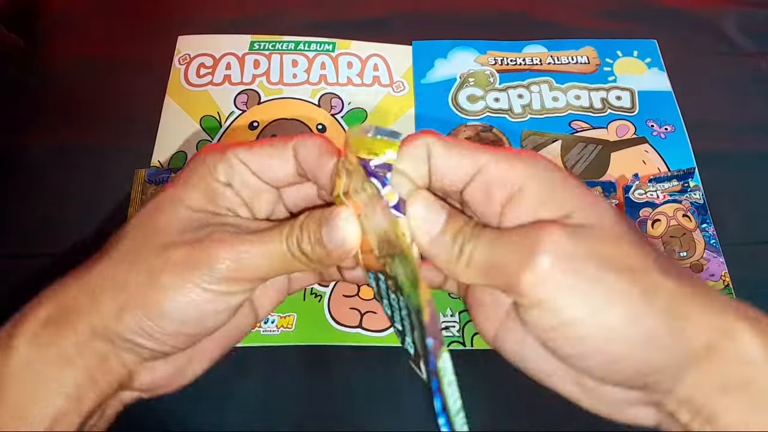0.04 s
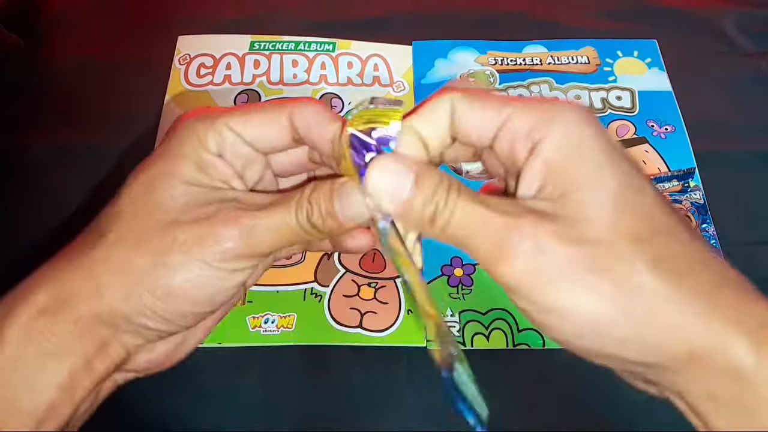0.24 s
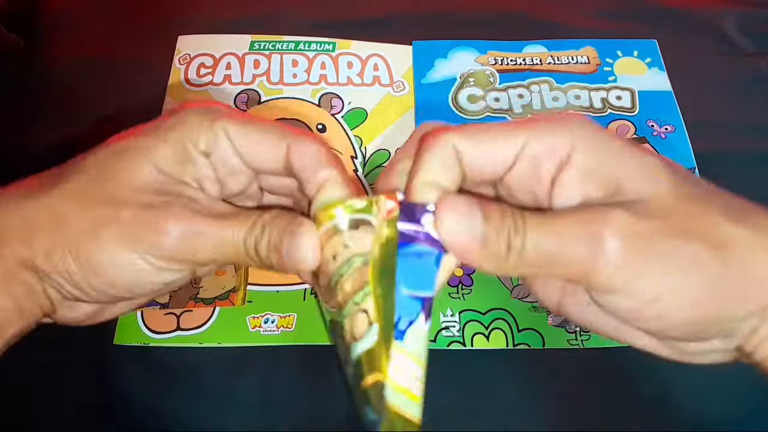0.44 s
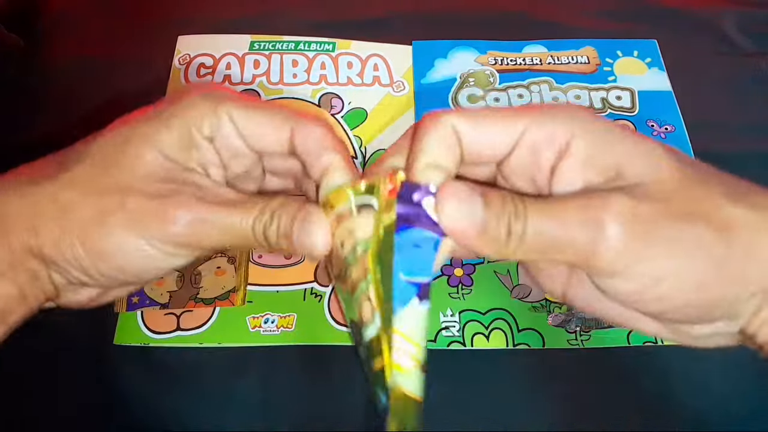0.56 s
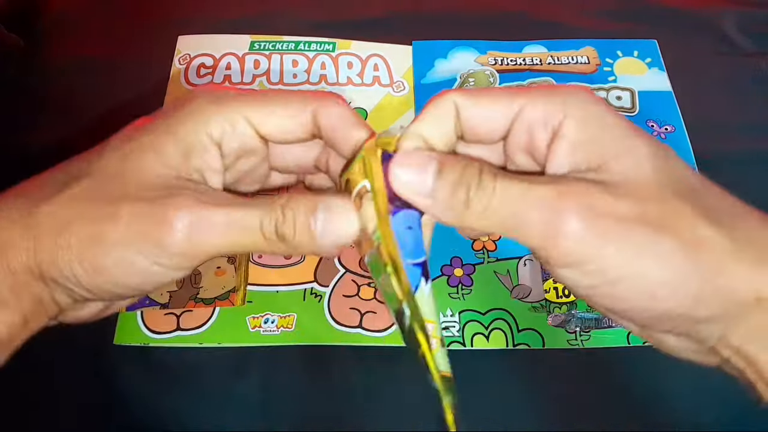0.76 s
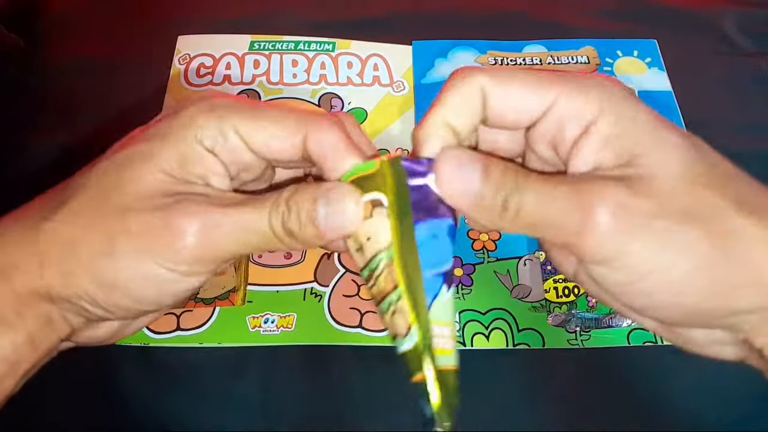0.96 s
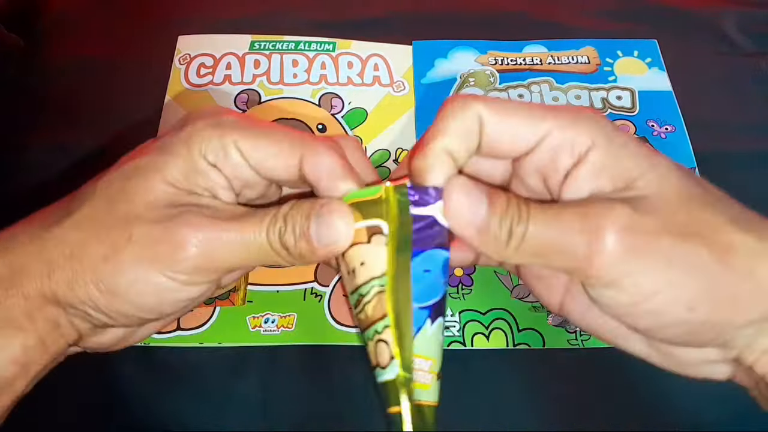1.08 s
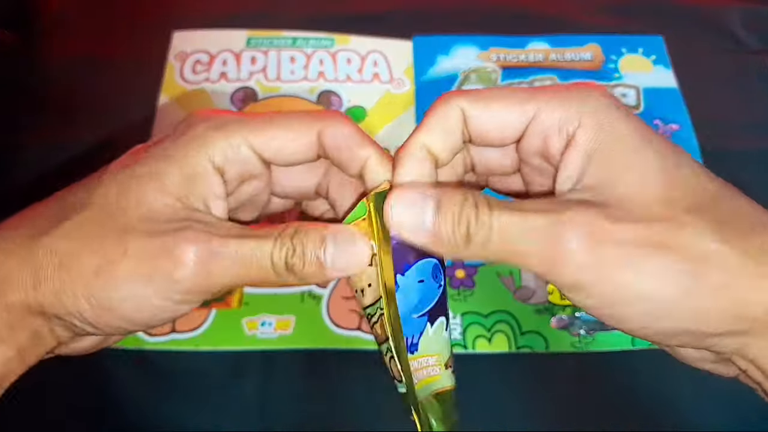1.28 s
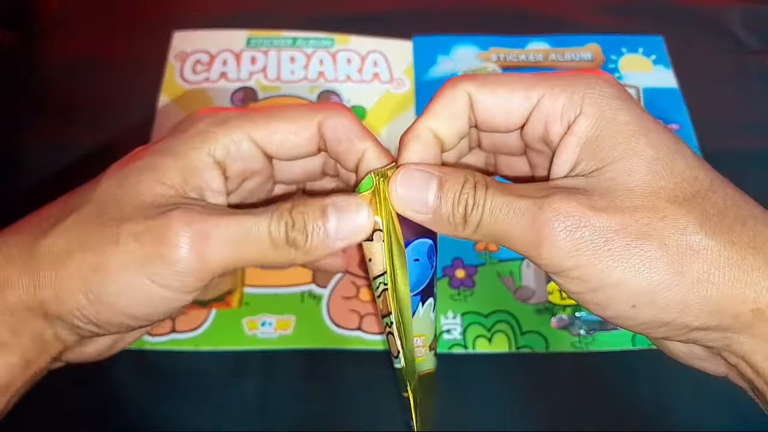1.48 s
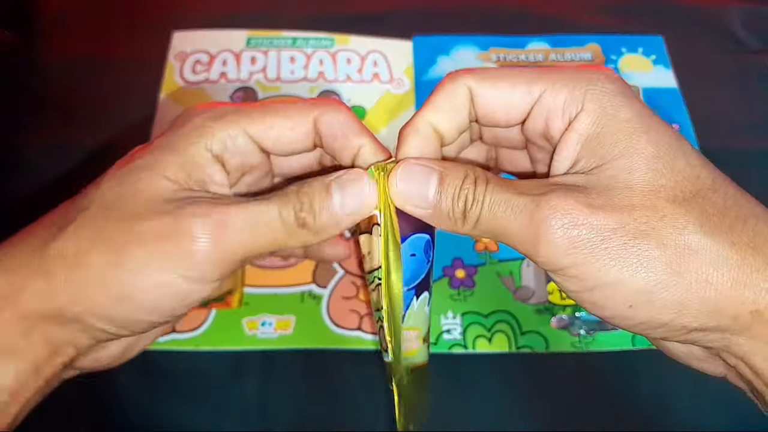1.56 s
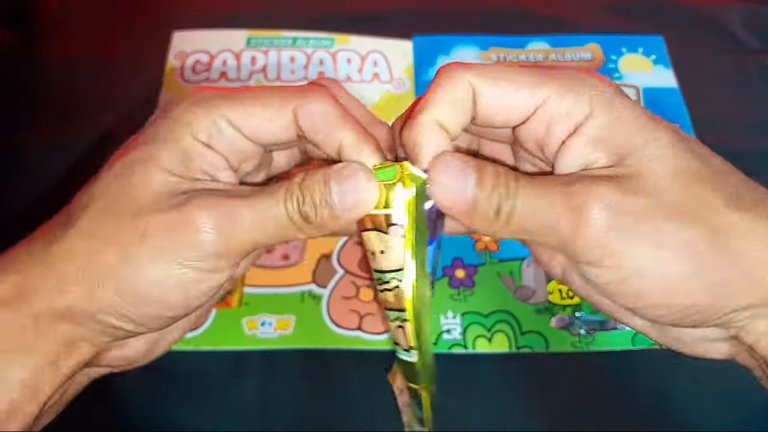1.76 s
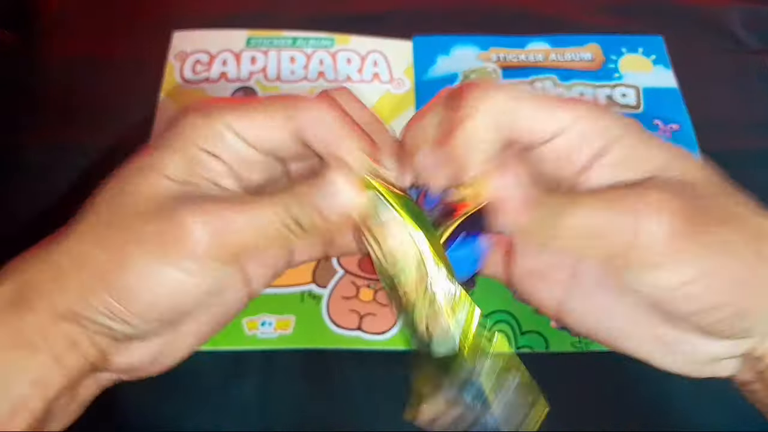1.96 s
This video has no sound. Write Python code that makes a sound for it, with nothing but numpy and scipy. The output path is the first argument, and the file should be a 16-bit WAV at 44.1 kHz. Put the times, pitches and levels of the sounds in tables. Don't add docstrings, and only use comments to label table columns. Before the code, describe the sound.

A thin foil packet is crinkled by hand very close to a phone microphone in a small room: bright snaps cluster early, scatter through the middle, thin out, then burst into a dense tear at the end.

```python
import sys
import numpy as np
from scipy import signal
from scipy.fft import rfft, irfft
from scipy.io import wavfile
from scipy.ndimage import uniform_filter1d

SR = 44100
rng = np.random.default_rng(int(sys.argv[2]) if len(sys.argv) > 2 else 0)


def bounce(signal):
    frames = np.transpose(np.atleast_2d(signal))
    limited = np.clip(frames, -1, 1)
    pcm = np.round(limited * 32767).astype(np.int16)
    wavfile.write(sys.argv[1], SR, pcm)


def voltage_ratio(level):
    return 10 ** (np.asarray(level, float) / 20)


N = 89390
FAR_DB = np.array([[0], [-5]])


def read(points, hz):
    f, value = np.transpose(points)
    return np.interp(np.log(hz + 1), np.log(f + 1), value)


def evened(x):
    return x / np.sqrt(np.mean(x ** 2) + 1e-20)


def add(mix, start, sound):
    part = mix[:, max(round(start * SR), 0):][:, :sound.shape[1]]
    part += sound[:, :part.shape[1]]


def pair(noise, same):
    return np.array([noise[0], same * noise[0] + np.sqrt(1 - same ** 2) * noise[1]])


def bandpass(x, low_hz, high_hz):
    return signal.sosfilt(signal.butter(2, [low_hz, high_hz], "bandpass", fs=SR, output="sos"), x)


def ringing(t, hz, width_hz):
    return np.sin(2 * np.pi * hz * t) * np.exp(-np.pi * width_hz * t)


# (frequency [Hz], level [dB per Hz])
HUM_SPECTRUM = [(25, -22), (60, 42), (170, 31.5), (700, -48), (2500, -9), (9500, -31)]


def room_hum():
    z = rfft(pair(rng.standard_normal((2, N)), 0.59))
    z = z * voltage_ratio(read(HUM_SPECTRUM, np.fft.rfftfreq(N, 1 / SR)))
    return voltage_ratio(-65.5) * evened(irfft(z, N)) * voltage_ratio(np.array([[2], [-3]]))


# (frequency [Hz], time to fall 60 dB [s])
ROOM_DECAY = [(900, 0.62), (1500, 0.4), (14000, 0.23)]
# (frequency [Hz], level [dB])
WALL_COLOUR = [(700, -2), (2000, -0.5), (4500, 0.5), (7400, -6.5), (12000, 2.5)]


def wall_echoes(x):
    room_db, turn_s = -9, .09
    size = SR // 2
    taps = np.zeros((6, size))
    at = np.arange(200, size - 20, 20) + rng.integers(0, 20, (6, (size - 201) // 20))
    np.put_along_axis(taps, at, rng.choice([-1., 1.], at.shape), 1)
    hz, t, z = signal.stft(taps, SR, nperseg=256)
    z = z * voltage_ratio(read(WALL_COLOUR, hz)[:, None] - 60 * t / read(ROOM_DECAY, hz)[:, None])
    tail = signal.istft(z, SR, nperseg=256)[1][:, :size]
    tail = voltage_ratio(room_db) * tail / np.linalg.norm(tail[0])
    turn = np.pi * np.arange(N) / SR / turn_s
    echoes = np.zeros((2, N))
    for k in range(3):
        share = np.sqrt(2 / 3) * np.cos(turn + k * np.pi / 3)
        echoes += signal.fftconvolve((x * share)[None], tail[k::3], axes=1)[:, :N]
    return echoes


# (time [s], peak level [dB], pitch [Hz])
FINGER_THUDS = [
    (.118, -30, 494),
    (0.375, -25.5, 386),
    (0.503, -36, 221),
    (0.656, -35.5, 303),
    (0.996, -34, 197),
    (1.173, -28, 348),
    (1.526, -30, 418),
    (2.017, -30.5, 232),
]


def thud(start, peak_db, hz):
    turns = np.arange(0, 8 / hz, 1 / SR) * hz
    puff = uniform_filter1d(rng.standard_normal(6000), size=20)[:len(turns)]
    puff = evened(np.gradient(uniform_filter1d(puff, size=20)))
    u = turns / 0.71
    knock = (np.sin(2 * np.pi * turns) + 0.5 * puff) * u * np.exp(1 - u)
    return start, voltage_ratio(peak_db + FAR_DB) * knock


def fingers():
    hands = np.zeros((2, N))
    for row in FINGER_THUDS:
        add(hands, *thud(*row))
    return hands


# (time [s], crackle level [dB])
HAND_STRAIN = [(0, -25), (.05, -37.5), (0.122, -32.5), (.28, -33), (.305, -20.5), (.4, -19.5), (.5, -30.5),
               (.63, -32.5), (.71, -31.5), (.88, -36.5), (1.183, -28.5), (1.4, -53.5), (1.53, -43),
               (1.64, -37), (1.84, -63), (1.898, -13), (2.03, -26.5)]


def strain_at(s):
    at, db = np.transpose(HAND_STRAIN)
    return np.interp(s, at, db - np.mean(db))


def skin_rub():
    rub_db, rub_hz = -57, 391
    strain_db = np.minimum(strain_at(np.arange(N) / SR), 8)
    lumps = evened(uniform_filter1d(rng.standard_normal(N), size=600))
    dull = evened(bandpass(pair(rng.standard_normal((2, N)), 0.68), rub_hz / 2, rub_hz * 1.63))
    return voltage_ratio(rub_db + strain_db + 5.5 * lumps + FAR_DB) * dull


def fine_crackle():
    crackles_per_s, spread_db, life_s = 1800, 4.2, .0004
    size = voltage_ratio(spread_db * np.minimum(rng.exponential(1, N), 3.2))
    size = size * (rng.random(N) < crackles_per_s / SR)
    life = signal.lfilter([1], [1, -np.exp(-1 / (life_s * SR))], size)
    thin = signal.butter(1, 800, "highpass", fs=SR, output="sos")
    grains = signal.sosfilt(thin, pair(rng.standard_normal((2, N)), 0.79) * life)
    s, db = np.transpose(HAND_STRAIN)
    return voltage_ratio(np.interp(np.arange(N) / SR, s, db)) * evened(grains)


def body_knock(foil):
    push = bandpass(foil ** 2, 70, 260)
    ring = ringing(np.arange(2 ** 11) / SR, 418, 17.4)
    knock = signal.oaconvolve(abs(foil), np.gradient(ring))[:N]
    return voltage_ratio(FAR_DB) * (voltage_ratio(-63.5) * evened(push) + voltage_ratio(-59) * evened(knock))


def snap(port, start, peak_db, sheet_hz=3500, sheet_db=-6):
    lead_s, rise_s, snap_s, after_s = .005, .0015, .0007, .005
    creak_db, after_db, snap_db, even_db = -17.5, -22, -3.5, -3
    split_hz = 5200
    t = np.arange(0, .025, 1 / SR)
    noise = rng.standard_normal((2, len(t) + 1))
    tense_db = strain_at(start)
    life = snap_s * voltage_ratio(tense_db / 7) * np.exp(0.2 * np.clip(noise[0, -1], -2, 2))
    since = t - lead_s
    creak = voltage_ratio(min(creak_db + tense_db, -2)) * np.exp(-abs(since) / rise_s)
    dying = np.exp(-abs(since) / life) + voltage_ratio(after_db) * np.exp(-abs(since) / after_s)
    shape = np.where(since < 0, creak, dying)
    tick = 0.62 * np.sign(noise[1, -1]) * (np.arange(len(t)) == round(lead_s * SR))
    z = rfft(pair(noise[:, :-1], 0.25) * shape + tick)
    burst = irfft(z / np.sqrt(uniform_filter1d(abs(z) ** 2, size=20)), len(t))

    floor_hz = min(440 * voltage_ratio(-0.71 * peak_db), 0.35 * sheet_hz)
    low = bandpass(burst, floor_hz, split_hz)
    fizz = signal.sosfilt(signal.butter(2, split_hz, "highpass", fs=SR, output="sos"), burst)
    rung = irfft(rfft(burst) * rfft(ringing(t, sheet_hz, 350)), len(t))
    plain = evened(low + low[0])
    tilt_db = (sheet_db - even_db) / 2
    share = .42 * min(voltage_ratio(tilt_db), 2)

    sheet = np.vstack([share * evened(rung) + (1 - share) * plain, .75 * plain[:1]])
    fizz = np.vstack([fizz, fizz[:1]])
    both = voltage_ratio(tilt_db) * evened(sheet) + voltage_ratio(-tilt_db) * evened(fizz)
    heard = np.convolve(both[0], port)
    peak = np.sqrt(uniform_filter1d(heard ** 2, size=31).max())
    return start - lead_s, voltage_ratio(peak_db + snap_db) * both / peak


# (time [s], peak level [dB], sheet pitch [Hz],
# sheet over fizz [dB])
MAIN_CREASES = [(0.0679, -8.5, 3770, 22), (0.1221, -3.5, 4650.0, -5.0), (0.1602, -7, 5000, -8.5),
                (0.201, -7, 3700, -9.5), (0.2142, -6, 4530, -5), (0.2193, -4, 2410.0, -19),
                (0.239, -3.5, 2660, -7), (0.2918, -5.5, 2530, -16), (0.2998, -4, 3770, -8),
                (0.302, -3.5, 4230, -6.5), (0.3119, -3, 2340, -1), (0.3263, -7.5, 2000, -7),
                (0.3355, -10.5, 2010, -1), (0.34, 3, 4820, -8.5), (0.3567, -3.5, 2740, -8),
                (0.3621, 2.5, 3870, -10), (0.3705, -0.5, 4330, -7), (0.377, -2.5, 1440, -5),
                (0.3857, -13.5, 4600, -1), (0.4101, -10, 2080, -7), (0.5713, -5, 4200, -8),
                (0.6051, -6, 3750, 1), (0.611, -2.5, 3630, -4), (0.625, -5, 4300, -10.5),
                (0.642, -5, 3000, -6.5), (0.6486, -3, 4240, -9.5), (0.658, -5.5, 4100, -7.5),
                 (0.6723, -9, 4100, -12), (0.7502, -7.5, 2130, 5), (0.761, -5, 4750, -8),
                 (0.8083, -8.5, 4040, -10.5), (0.834, -13.5, 4670, -11), (0.8539, -2.5, 2460, -10),
                 (0.8695, -3.5, 2500.0, -45), (0.8827, -8, 4700, -8.5), (0.9069, -5, 5170, 23),
                 (0.9242, -5.5, 2050, -5), (0.951, -5.5, 4600, -12.5), (0.9997, -6, 2250, -4.5),
                 (1.0898, -4, 1700, -0.5), (1.1034, -9, 3460, -4), (1.121, -8, 1280, -6),
                 (1.1412, -8.5, 4350, 23), (1.1517, -5, 4680, -6), (1.2821, -4.5, 2500, -7),
                 (1.4104, -12.5, 4150, -9.5), (1.4604, -13.5, 3550, -17),
                (1.4915, -6, 4370, -8.5), (1.5264, -10, 1204, 19), (1.5338, -7, 1980.0, -19),
                (1.571, -15.5, 3870, 23), (1.6025, -3.5, 4800, -10), (1.63, -1, 2600, -8.5),
                (1.639, -6, 4230, 2.5), (1.82, -10.5, 4220, -8), (1.8343, -5.5, 4170, -8.5),
                (1.882, 0.5, 1610, -9), (1.8904, -5, 4200, -8), (1.8975, -0.5, 3960, -2),
                (1.8994, -8.5, 1200, 4), (1.9061, -6.5, 1920, -3.5), (1.9172, -6.5, 4400, -5),
                (1.921, -5.5, 4000, -2), (1.9305, -3, 4260, -6), (1.954, -11.5, 2350, -2),
                (1.963, -10, 1930, -3), (1.9759, -4.5, 4160, 3), (1.9792, -1.5, 4020, -6),
                (1.9902, -0.5, 5080, -11), (2.002, -12, 4960, -5)]
FURTHER_CREASES = [
    (1.175, -16, 1410, 0),
    (1.9673, -6, 4040, 10),
    (1.971, -7, 4200, 1),
]
# (time [s], peak level [dB])
FLURRY_CREASES = [(0.082, -13.5), (0.0926, -20), (0.1178, -10.5), (0.279, -16.5), (0.286, -18),
                  (0.3179, -7.5), (0.352, -9.5), (0.392, -8), (0.5637, -14.5), (0.5945, -12.5),
                  (0.745, -11.5), (0.8022, -19.5), (0.81, -20), (0.8644, -12), (0.8731, -10.5),
                  (0.8874, -9.5), (0.8907, -7.5), (0.9127, -10.0), (0.988, -17), (0.9946, -5), (1.226, -17),
                  (1.6437, -9), (1.648, -9), (1.6552, -13), (1.788, -22), (1.8778, -11)]
# (time [s], peak level [dB], sheet pitch [Hz], sheet over
# fizz [dB])
SMALL_CREASES = [(.009, -34, 3400, -7), (0.0625, -15, 3550, -11), (.194, -17, 3600, -7),
                 (.501, -18, 1530, 0), (0.487, -25, 1320, 7), (.527, -21, 1200, 7),
                 (1.264, -27.5, 1870, -4), (1.338, -30.5, 3960, -6), (1.5, -20, 3800, 0),
                 (1.5147, -15, 2230, -11), (1.5866, -13, 4390, -18), (1.856, -22.5, 1700, 5),
                 (1.8745, -14.5, 1430, 4.5),
                 (0.0031, -19.5, 3660, -6), (0.1137, -16, 4100, 11), (0.1525, -16, 4870, -7),
                      (0.23, -14, 4440, -7), (0.394, -8.5, 4260, -5.5), (0.404, -17, 2700, -10),
                      (0.4207, -14, 2800, -12), (0.4627, -21, 1600, -4), (0.512, -18.5, 2710, -9),
                      (0.537, -19, 2330, -10), (0.5409, -22, 2100, -4), (0.5432, -20, 2710, -6),
                      (0.5833, -22, 3800, 2), (0.587, -32, 4080, 0), (0.6339, -16, 3700, -6),
                      (0.637, -21, 3770, -8), (0.7278, -21.5, 4010, -2), (0.732, -26, 2410, -3),
                      (0.7572, -14.5, 3830, 10), (0.794, -27, 3060, -16),
                 (0.8128, -12, 4620, 1), (0.8298, -3, 3880, -12.5), (0.847, -16, 3940, -5.5),
                      (0.8777, -18, 4030, -7), (0.8986, -11.5, 2220, -5), (0.918, -12, 3360, -18),
                      (1.021, -23.5, 2220, -5), (1.2004, -19, 4420, -6), (1.213, -17, 4000, -8),
                      (1.273, -29, 1890, 8), (1.3766, -34, 3820, 4), (1.5227, -14, 2450, -12),
                      (1.529, 3, 3640, -9), (1.597, -29, 3300, -13), (1.6617, -11.5, 4090, -11.5),
                      (1.7507, -29, 4010, -7), (1.7593, -26, 3960, -13), (1.7662, -33, 4050, -9),
                      (1.7706, -26, 4820, -6), (1.777, -28, 4070, -7), (1.781, -24.5, 4900, 9),
                      (1.791, -29, 4090, 8), (1.8034, -29, 4050, -9), (1.8116, -36, 1890, 6),
                      (1.8158, -29.5, 1490, 18)]


def crumpling_foil(port):
    fine = fine_crackle()
    foil = np.vstack([fine, fine[:1]])
    strong = MAIN_CREASES + FURTHER_CREASES
    weak = FLURRY_CREASES + SMALL_CREASES
    for row in strong + weak:
        add(foil, *snap(port, *row))
    return foil


def causal(points, size=2048):
    log_gain = np.log(voltage_ratio(read(points, abs(np.fft.fftfreq(size, 1 / SR)))))
    return np.fft.ifft(np.exp(np.conj(signal.hilbert(log_gain)))).real[:size // 2]


# (frequency [Hz], level [dB])
NEAR_RESPONSE = [(60, -11.5), (700, -26), (1500, -15.5), (4000, -8.5), (5100, -4), (7400, 5.5),
                 (9000, -27.5), (15500, -24.5)]
# (frequency [Hz], level [dB])
FAR_RESPONSE = [(60, -11), (700, -31.5), (2000, -17.5), (5000, -15.5), (7500, -8.5), (8600, -21.5),
                (12000, -23.5), (16000, -34.5)]


def microphone_ports():
    return np.array([causal(NEAR_RESPONSE), np.roll(causal(FAR_RESPONSE), 3)])


def scene():
    ports = microphone_ports()
    foil = crumpling_foil(ports[0, :2 ** 7])
    direct_and_walls = foil[:2] + wall_echoes(foil[2])
    heard = signal.fftconvolve(direct_and_walls, ports, axes=1)[:, :N]
    return heard + fingers() + room_hum() + skin_rub() + body_knock(foil[2])


def band_limit(x):
    return signal.sosfilt(signal.butter(12, 16480, fs=SR, output="sos"), x)


def record(dry):
    mix = np.clip(dry, -.99, .99)
    return band_limit(mix)


dry = scene()
out = record(dry)
bounce(out)
```